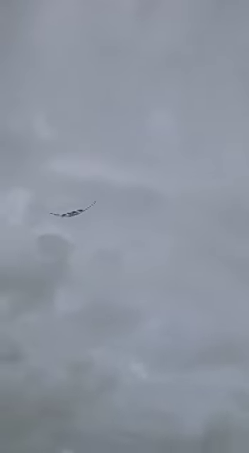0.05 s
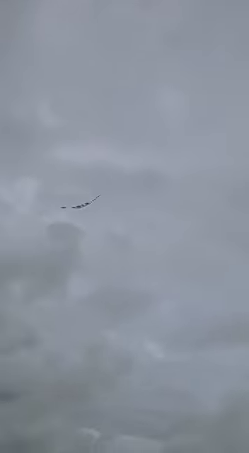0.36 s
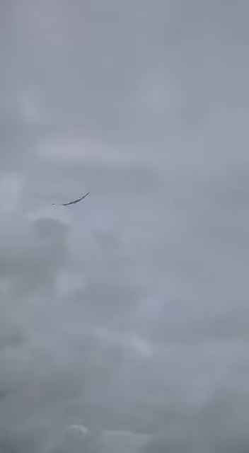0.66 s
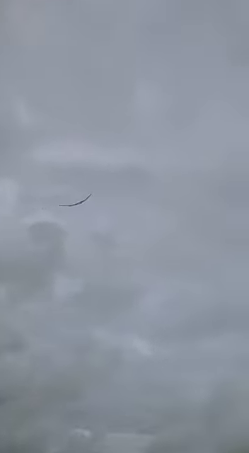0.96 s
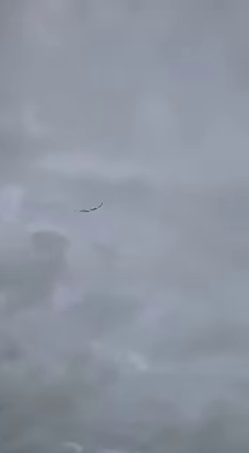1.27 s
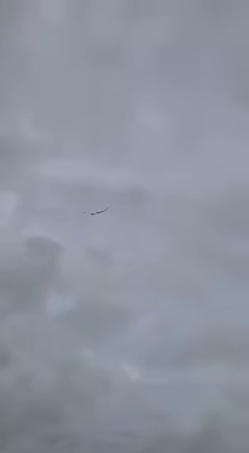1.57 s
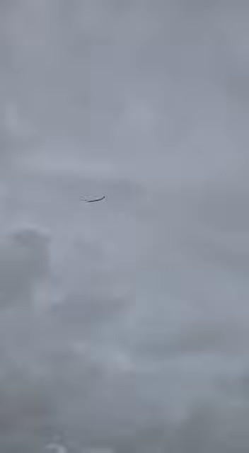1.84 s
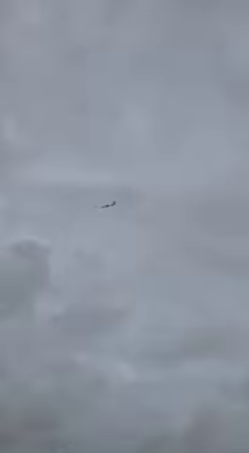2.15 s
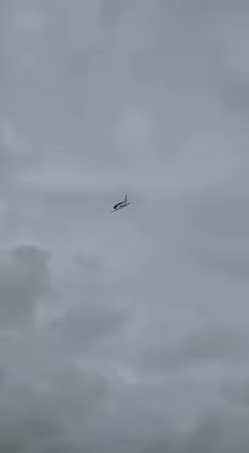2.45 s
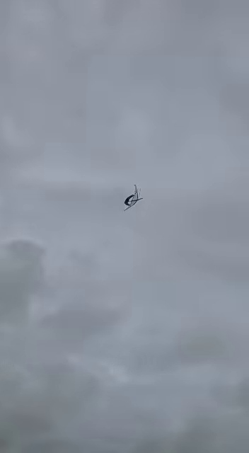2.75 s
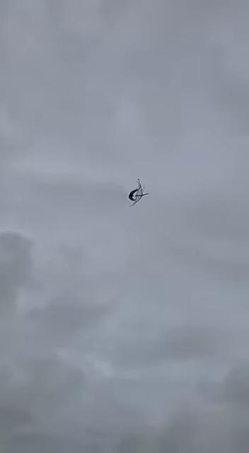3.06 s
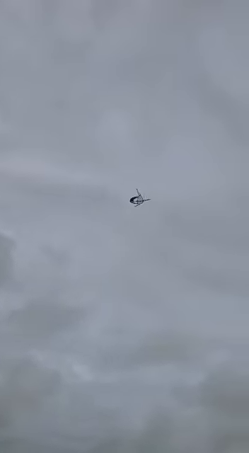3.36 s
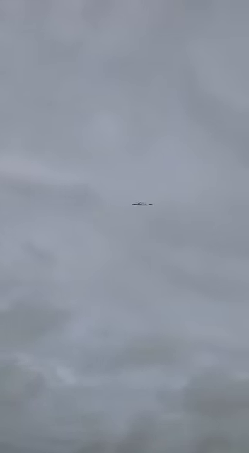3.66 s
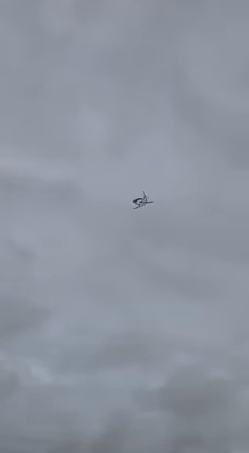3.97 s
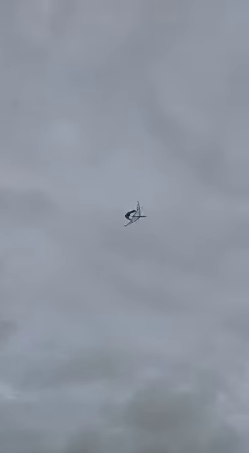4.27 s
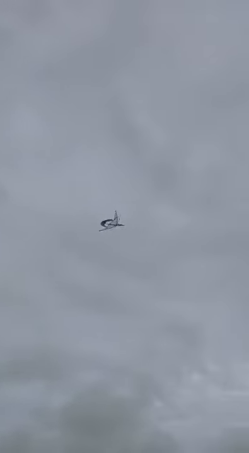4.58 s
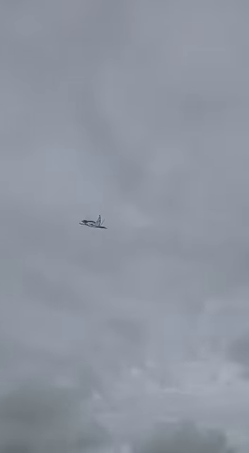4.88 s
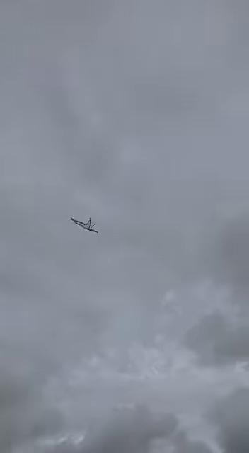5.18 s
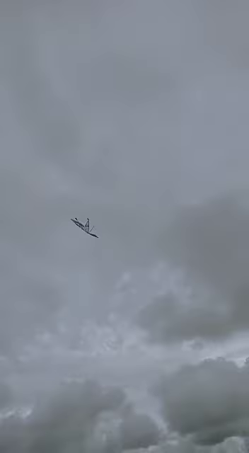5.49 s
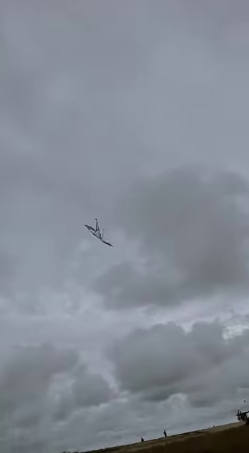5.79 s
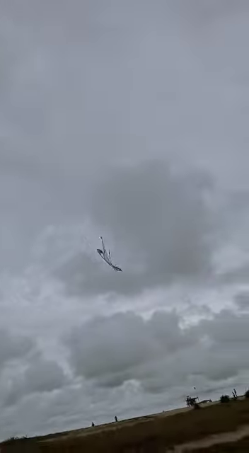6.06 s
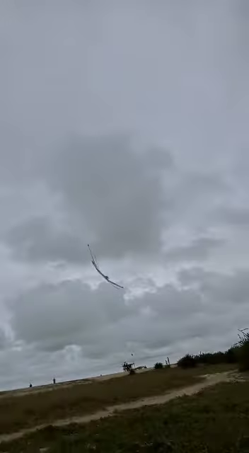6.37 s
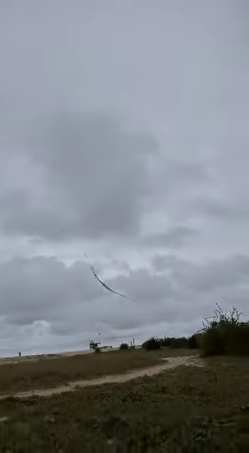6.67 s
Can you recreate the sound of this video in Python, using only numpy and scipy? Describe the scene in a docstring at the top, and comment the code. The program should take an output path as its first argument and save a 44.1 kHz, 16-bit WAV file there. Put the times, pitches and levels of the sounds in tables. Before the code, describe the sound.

Outdoors in a field, the fast pulsing buzz of a kite's ribbon recedes, with a few light rustles near the microphone and a soft hiss behind. Low, gusty wind buffeting takes over in the middle, almost covering some faint, high bird chirps. Then the gusts die down and the kite returns, whirring higher and louder as it swoops near.

```python
"""A kite with a hummer (a ribbon that sings in the wind) flies off, turns far away and dives back.
The ribbon swings about 17 times a second and sheds eddies, little whirls of air that sing near 1 kHz
when the kite is close and lower when it is far. The ground echoes them. Over a steady background hiss,
gusts buffet the microphone, something rustles close by and a small bird ticks far off."""
import sys
import numpy as np
from scipy import signal
from scipy.fft import rfft, irfft
from scipy.io import wavfile
from scipy.ndimage import uniform_filter1d

SR = 44100
rng = np.random.default_rng(int(sys.argv[2]) if len(sys.argv) > 2 else 0)


def wav_out(sig):
    """Save sig, one row per channel (or a flat mono array), as 16-bit PCM at SR to the path in sys.argv[1]."""
    wavfile.write(sys.argv[1], SR, np.round(np.clip(np.atleast_2d(sig).T, -1, 1) * 32767).astype(np.int16))


N = 305613
TIME = np.arange(N) / SR


def undb(db):
    """Turn decibels (dB) into a number to multiply a sound by."""
    return 10 ** (np.asarray(db) / 20)


def unit(x):
    """Scale a signal so that its average strength (rms) is 1."""
    return x / np.sqrt(np.mean(np.abs(x) ** 2))


def curves(rows):
    """Join rows that start with a time by straight lines: one curve for each further column."""
    seconds, *columns = np.transpose(rows)
    return [np.interp(TIME, seconds, column) for column in columns]


def walk(rate):
    """A smooth random wobble of strength 1 that changes up to about `rate` times a second."""
    hz = np.arange(N // 2 + 1) * SR / N
    return unit(irfft(rfft(rng.standard_normal(N)) * np.exp(-.5 * (hz / rate) ** 2), N))


def colour(x, points):
    """Shape the bass and treble of x, at strength 1. Each point: frequency in Hz, relative level in dB."""
    hz, db = np.transpose(points)
    all_hz = np.maximum(np.arange(N // 2 + 1) * SR / N, 1)
    return unit(irfft(rfft(x) * undb(np.interp(np.log(all_hz), np.log(hz), db)), N))


def noise(points):
    """Random noise with the colour given by (Hz, dB) points."""
    return colour(rng.standard_normal(N), points)


def add(out, start, sound):
    """Mix a short sound in at a start time in seconds."""
    i = max(int(start * SR), 0)
    out[i:i + len(sound)] += sound[:N - i]


def background_hiss():
    """Steady hiss with a high microphone ring, dipping as the recorder turns down in strong wind."""
    # Each row: time in seconds, relative level of the hiss in dB, that of the ring in dB.
    hiss_levels = [(0, -49.5, -58), (.75, -52.5, -62.5), (1.1, -50.5, -55), (1.35, -55.5, -66),
                   (2.5, -55, -64.5), (2.7, -59.5, -72), (4.84, -58.5, -70.5), (5, -54.5, -62.5),
                   (6, -52, -57), (6.93, -52, -61.5)]
    # A fine high sheen that swells during the dive. Each row: time in seconds, level in dB.
    sheen_levels = [(0, -81), (2.6, -98.5), (4.7, -84.5), (5.25, -66), (5.9, -62), (6.35, -61), (6.93, -81)]
    # Each row of both: frequency in Hz, relative level in dB.
    hiss_colour = [(200, -0.5), (500, 7.5), (900, 7.5), (1400, -3), (2200, 0.5), (2650, -1), (3200, -0.5),
                   (3800, -2), (4300, -6.5), (5000, -16), (6500, -21.5), (9000, -20), (15000, -36.5)]
    ring_colour = [(2000, -9.5), (4500, -19.5), (6500, -16), (8000, -3.5), (9300, 7.5), (10500, -5.5),
                   (12000, -9.5), (15500, -12.5)]
    hiss_db, ring_db = curves(hiss_levels)
    hiss = noise(hiss_colour) * undb(hiss_db + 7.5 + .86 * walk(11))
    ring = noise(ring_colour) * undb(ring_db - 1 + .7 * walk(15))
    sheen = noise([(3000, -32.5), (8000, -12), (11000, .5), (15500, 0)]) * undb(curves(sheen_levels)[0])
    return hiss + ring + sheen


def bird(start_hz=5850, end_hz=5000, tick_s=.02, spacing_s=.0402, first_tick_db=-3.5):
    """A call is a run of quick falling whistles, the first one softer; wind on the way makes them waver."""
    # Each row: start in seconds, number of ticks, relative level in dB.
    calls = [(1.628, 2, -53.5), (1.835, 2, -55), (2.038, 3, -53.5), (2.282, 3, -53.5), (2.523, 3, -53),
             (2.771, 3, -56.5), (3.013, 3, -60)]
    out = np.zeros(N)
    progress = np.linspace(0, 1, int(tick_s * SR))
    for start, count, db in calls:
        for k in range(count):
            hz = (start_hz + (end_hz - start_hz) * progress) * (1 + .008 * rng.standard_normal())
            tick = np.sin(np.pi * progress) * np.sin(2 * np.pi * np.cumsum(hz) / SR)
            add(out, start + k * spacing_s - .002, undb(db + first_tick_db * (k == 0)) * tick)
    return out * undb(3 * walk(150) - 6)


def rustles():
    """Short rubs close to the microphone, each a cluster of tiny slips."""
    # Each row: start in seconds, level at the loudest point in dB, length in seconds.
    rubs = [(0.12, -37.5, 0.005), (0.316, -45.5, 0.071), (0.711, -44, 0.0085), (0.935, -42.5, 0.076),
            (1.016, -47.5, .06), (1.069, -41, 0.067), (1.13, -40.5, 0.074), (1.521, -53, .025),
            (2.192, -52, 0.026), (3.438, -51.5, 0.03)]
    loudness = np.zeros(N)
    for start, db, length in rubs:
        progress = np.linspace(0, 1, max(int(length * SR), 8))
        add(loudness, start, undb(db) * np.sin(np.pi * progress ** .53))
    slips = rng.standard_normal(N) * undb(2.6 * walk(400))
    return loudness * colour(slips, [(500, -17), (1500, 1.5), (2800, 7.5), (4200, -8), (6500, -17.5),
                                     (8000, -9.5), (9300, 1.5), (11000, -10), (15500, -15)])


def wind_level(rise_s=.013, fall_s=.021, sag_db_per_s=11):
    """The wind's level in dB: each gust rises fast, sags while it lasts and dies away into the breeze."""
    # The light air between gusts. Each row: time in seconds, level in dB.
    breeze = [(0, -35), (.7, -29), (1.25, -36), (1.9, -37), (2.2, -27), (3.1, -25.5), (4.35, -37),
              (5.4, -42), (6.1, -43), (6.8, -44), (6.93, -37)]
    # Each row: start in seconds, length in seconds, level halfway through in dB.
    gusts = [(0.152, 0.056, -25.5), (.21, 0.13, -17.5), (0.464, 0.057, -22), (0.557, 0.011, -22),
             (0.654, .13, -24.5), (0.852, 0.025, -21), (0.951, 0.11, -23.5), (1.419, 0.093, -29.5),
             (1.675, 0.019, -22), (1.758, 0.042, -19), (1.962, 0.052, -21), (2.071, 0.1, -24.5),
             (2.23, 0.033, -26), (2.334, 0.095, -25), (2.581, 0.16, -10.5), (2.791, 0.064, -11.5),
             (2.886, 0.08, -19.5), (3.045, 0.065, -16), (3.147, 0.12, -15.5), (3.303, 0.075, -13.5),
             (3.458, 0.063, -22.5), (3.593, 0.15, -18), (3.781, 0.013, -17.5), (3.832, .1, -14),
             (3.973, 0.025, -14.5), (4.036, 0.1, -22.5), (4.191, .04, -20), (4.38, 0.025, -29),
             (5.72, 0.042, -36.5), (5.86, 0.063, -33)]
    power = undb(curves(breeze)[0]) ** 2
    for start, length, db in gusts:
        age = TIME - start
        rise = np.clip(1 + age / rise_s, 0, 1)
        sag_db = sag_db_per_s * (np.clip(age, 0, length) - length / 2)
        fall = np.exp(-np.clip((age - length) / fall_s, 0, 20))
        power = power + (undb(db - sag_db) * rise * fall) ** 2
    return 10 * np.log10(power)


def turbulence(points):
    """Churning air: noise of a given colour, with its slow swells evened out."""
    churn = noise(points)
    return churn / np.sqrt(uniform_filter1d(churn ** 2, size=2400))


def wind_rumble(gust_db):
    """Stronger gusts break into smaller eddies on the microphone, so the rumble brightens as it swells."""
    # Each row of both: frequency in Hz, relative level in dB.
    light_air = [(20, -60), (40, -23), (75, 0.5), (150, -1.5), (250, -12), (400, -21), (700, -47),
                 (1500, -67.5), (3000, -74)]
    full_gust = [(15, -59), (40, -32.5), (75, 0), (150, 5.5), (280, 0), (450, -8.5), (700, -25),
                 (1100, -48), (1800, -63.5), (3500, -85.5)]
    force = np.clip((gust_db + 32.5) / 16, 0, 1) ** 2
    rumble = np.sqrt(1 - force) * turbulence(light_air) + np.sqrt(force) * turbulence(full_gust)
    return unit(rumble * undb(2.25 * walk(22))) * undb(gust_db)


def buffets(rise_s=.0093):
    """Single pushes of air thump the microphone."""
    # Each row: time in seconds, relative level in dB.
    pushes = [(0.232, -6.5), (1.777, -11), (2.081, -14), (2.448, -7.5), (2.61, -5.5), (2.728, 1.5),
              (2.802, -3), (3.049, -2.5), (3.153, -4.5), (3.681, -3.5), (3.77, -2.5), (3.834, 0),
              (4.117, -6.5)]
    loudness = np.zeros(N)
    age = TIME[:SR // 5] / rise_s
    for start, db in pushes:
        add(loudness, start - .003, undb(db - 11.5) * age * np.exp(1 - age))
    return loudness * turbulence([(20, -54), (40, -28), (120, 2), (300, 4), (520, -7.5), (800, -22.5),
                                  (1300, -53.5), (2200, -64), (4000, -78)])


def gust_crackle(gust_db, crack_at_s=2.62, crack_db=-22, crack_fade_s=.0044):
    """The hardest gusts crackle on the microphone's opening, and the worst begins with a crack."""
    crackle = noise([(200, -21), (450, 13), (800, 5), (1200, -18), (1800, -26.5), (3000, -46.5),
                     (6000, -57.5)])
    crackle = unit(crackle * undb(4 * walk(60)))
    crackle_db = -28 + 2.3 * (gust_db + 11)  # grows much faster than the gust itself
    crack = noise([(200, -14), (600, 3), (1200, -8.5), (1800, -13.5), (2600, -38), (6000, -54)])
    crack = crack * undb(crack_db) * np.exp(-np.abs(TIME - crack_at_s) / crack_fade_s)
    return crackle * undb(crackle_db) + crack


def ground_echo(direct, share_low=.18, share_high=.39):
    """Add the duller copy that the ground sends back, sooner and weaker as the kite comes down."""
    # Each row: time in seconds, delay of the echo in seconds.
    delays = [(0, .00685), (.35, .00648), (.75, .00638), (1.7, .0068), (4.9, .0072), (5.35, .00685),
              (5.7, .0061), (6.35, .0037), (6.93, .0017)]
    delay_s, = curves(delays)
    share = np.interp(delay_s, [delay_s.min(), delay_s.max()], [share_low, share_high])
    dull = signal.sosfilt(signal.butter(1, 4000, fs=SR, output="sos"), direct)
    return direct + share * np.interp(TIME - delay_s, TIME, dull, left=0)


def eddy_tone(hz, wander, flutter_db):
    """Eddies shed in step make one tone, unsteady in pitch and strength."""
    phase = 2 * np.pi * np.cumsum(hz * (1 + wander * walk(93.2))) / SR
    return unit(np.sin(phase) * undb(flutter_db * walk(150)))


def eddy_noise(hz, width_hz):
    """Eddies shed out of step make a band of noise that follows the pitch."""
    phase = 2 * np.pi * np.cumsum(hz) / SR
    return walk(width_hz) * np.cos(phase) + walk(width_hz) * np.sin(phase)


def repeat_swing(cycle, rows):
    """Repeat the curves of one swing, cycle after cycle."""
    share, *columns = np.transpose(rows)
    return np.array([np.interp(cycle, share, column, period=1) for column in columns])


def ribbon_swing(level_db, facing, first_stroke_cycles=.81, jitter_cycles=.03494):
    """Each swing is a fast stroke and a weak return; gusty air on the way makes distant swings uneven."""
    # Each row: time in seconds, swings per second.
    swing_rate = [(0.0, 17.387), (0.6, 17.365), (1.0, 17.387), (1.3, 17.875), (2.0, 17.491), (4.5, 18.651),
                  (5.0, 18.504), (5.6, 18.425), (6.1, 17.731), (6.7, 17.069), (6.93, 17.703)]
    # One swing, heard from behind and from ahead. Each row: share of a cycle from the stroke,
    # relative speed, relative level in dB, change in the overtones in dB.
    from_behind = [(-.43, .95, -12, -4), (-.3, .87, -16, -3), (-.2, .92, -22, -3), (-.12, 1.15, -5, 6),
                   (0, 1.09, 3, 0), (.1, .95, 0, -1), (.2, .84, -13, -3), (.3, .84, -19, -1),
                   (.43, .93, -14, -3)]
    from_ahead = [(-.42, .93, -10, -4), (-.3, .82, -14, -3), (-.18, .84, -21, -2), (-.1, 1.03, -3, 2),
                  (-.03, 1.13, 3, 2), (.05, 1.02, -1, 0), (.15, .82, -8, -5), (.29, .8, -19, -1),
                  (.42, .92, -12, -3)]
    far = np.interp(level_db, [-36, -26], [1, 0])
    cycle = np.cumsum(curves(swing_rate)[0]) / SR - first_stroke_cycles
    cycle = cycle + jitter_cycles * far * walk(24.97)
    return (1 - facing) * repeat_swing(cycle, from_behind) + facing * repeat_swing(cycle, from_ahead)


def ribbon_tone(hz, whip, overtone_db):
    """Eddies tug sideways (lift) and, about twice as fast, backwards (drag); whipping unsettles both."""
    lift_tone = eddy_tone(hz, wander=.025 * whip, flutter_db=1.3)
    drag_tone = eddy_tone(2.09 * hz, wander=.012 + .017 * whip, flutter_db=2.5)
    lift = unit(lift_tone + undb(-4) * whip * eddy_noise(hz, width_hz=150))
    drag = unit(drag_tone + undb(-3.5) * whip * eddy_noise(2.05 * hz, width_hz=420))
    rasp = undb(-6.5) * eddy_noise(3.15 * hz, width_hz=280)
    rasp += undb(-16.5) * eddy_noise(4.2 * hz, width_hz=270)
    return lift + undb(overtone_db) * (drag + rasp)


def ribbon_swish(pitch, speed, throb_db, throb_share=.5):
    """Nearer its ends the ribbon moves slower, so it sounds lower and throbs less."""
    # Each row: time in seconds, relative level in dB.
    swish_levels = [(0, -4.5), (.22, -8.5), (5.2, -9), (5.7, 0), (6.2, 6), (6.55, 1.5), (6.86, -11)]
    swish = eddy_noise(.8 * pitch * speed, width_hz=136)
    swish += undb(-5.5) * eddy_noise(1.6 * pitch * speed, width_hz=540)
    swish += undb(-17.5) * eddy_noise(2.9 * pitch, width_hz=230)
    swish += undb(-12.5) * eddy_noise(.38 * pitch, width_hz=83)  # slower eddies off the kite's thick rods
    return swish * undb(curves(swish_levels)[0] + throb_share * throb_db)


def edge_hiss(level_db, facing, whip, throb_db):
    """Air tears along the ribbon's edge: loudest in mid-stroke, from ahead and when it whips widely."""
    # Each row: frequency in Hz, relative level in dB.
    edge_colour = [(1500, -10), (3500, 3), (5000, 1.5), (6500, -13), (9300, 2.5), (11000, -6.5),
                   (15500, -12.5)]
    return noise(edge_colour) * undb(level_db - 50.5 + 10.5 * facing + 9.5 * whip + .75 * throb_db)


def hummer(turn_start_s=2.5, turn_length_s=2, whip_loss_db=2.5):
    """The ribbon's speed through the air sets the pitch and strength of its eddies within every swing."""
    # The kite's flight out and back. Each row of both: time in seconds, eddy pitch in Hz,
    # relative level in dB, relative level of the overtones in dB.
    leaving = [(0.08, 947, -14, -9), (.3, 946, -16, -15), (.51, 958.9, -15.5, -10.5), (.6, 905.5, -19, -9),
               (.7, 944.3, -21.5, -10), (.86, 950, -23.5, -19), (.97, 905.4, -31, -11),
               (1.2, 790, -29.5, -18), (1.48, 746, -34, -8.5), (2.1, 585, -54, -12)]
    diving = [(4.4, 495.6, -48, -29), (4.8, 544.2, -38.5, -17), (5.17, 710.6, -35.5, -7),
              (5.88, 810.4, -39, -1.5), (6.17, 753.7, -32, -9), (6.36, 839.8, -25.5, -16.5),
              (6.68, 899.8, -21.5, -6.5), (6.75, 968, -17.5, -9), (6.9, 992, -15.5, -7.5)]
    # How widely the ribbon whips. Each row: time in seconds, depth of the pitch sweep (0 is none).
    whip_depths = [(.03, 1.3), (.11, 1.8), (.19, .3), (.33, .2), (.4, .8), (.6, 1.4), (.67, .2), (.8, .25),
                   (1.4, .55), (4.5, .3), (5.3, .5), (5.7, 1.6), (6.45, 1.9), (6.8, 1.1), (6.86, .35),
                   (6.915, 1.4)]
    # How well the hummer gives off sound. Each row: frequency in Hz, relative level in dB.
    radiation = [(300, -7), (700, 1.5), (980, 4.5), (1250, 0.5), (1480, -5.5), (1800, -0.5), (2200, 6),
                 (2500, -1.5), (2800, -7), (3600, -6.5), (5000, -4.5), (9000, 6)]
    pitch, level_db, overtone_db = curves(list(leaving) + list(diving))
    whip, = curves(whip_depths)
    facing = np.clip((TIME - turn_start_s) / turn_length_s, 0, 1)  # 0 flying away, 1 coming back
    speed, throb_db, swing_overtone_db = ribbon_swing(level_db, facing)
    throb_db = throb_db * np.interp(level_db, [-35, -23], [.66, 1.08])  # from afar the throb is blurred
    level_db = level_db - whip_loss_db * (whip - 1)  # a ribbon that swings evenly sings louder
    tone = undb(throb_db - 3.5) * ribbon_tone(pitch * speed ** whip, whip, overtone_db + swing_overtone_db)
    song = (tone + ribbon_swish(pitch, speed, throb_db)) * undb(level_db)
    return np.std(song) * colour(song, radiation) + edge_hiss(level_db, facing, whip, throb_db)


def scene():
    """The kite, the wind and the quieter sounds, all heard at one microphone."""
    gust_db = wind_level()
    kite = ground_echo(hummer())
    wind = wind_rumble(gust_db) + buffets() + gust_crackle(gust_db)
    return (kite + wind + background_hiss() + rustles() + bird())[None]


def record(dry, ceiling=.9, top_hz=15550):
    """The recorder rounds off the tallest peaks and cuts the highest treble."""
    rounded = dry / (1 + (dry / ceiling) ** 6) ** (1 / 6)
    return signal.sosfilt(signal.ellip(10, .1, 90, top_hz, fs=SR, output="sos"), rounded)


dry = scene()
out = record(dry)
wav_out(out)
```